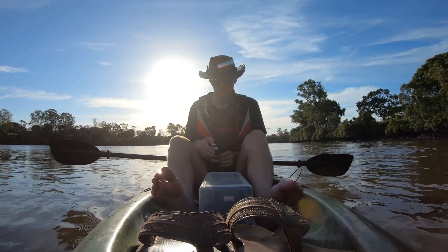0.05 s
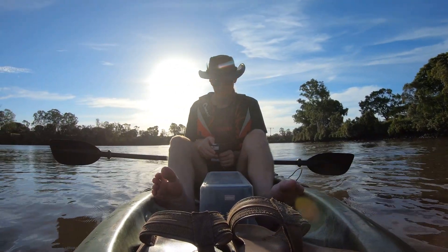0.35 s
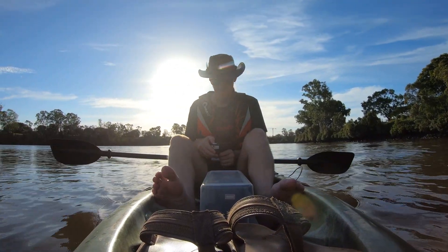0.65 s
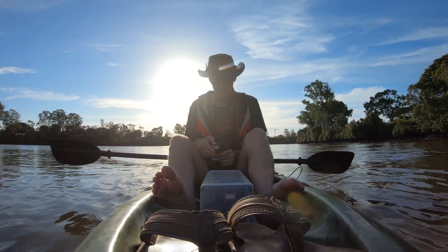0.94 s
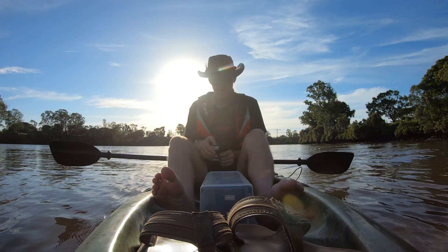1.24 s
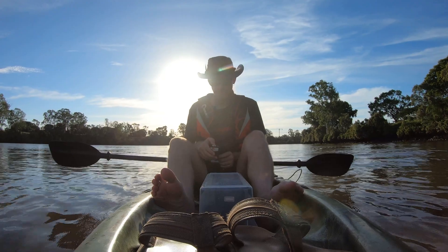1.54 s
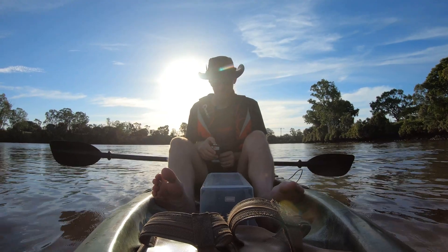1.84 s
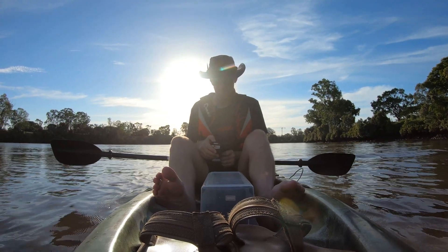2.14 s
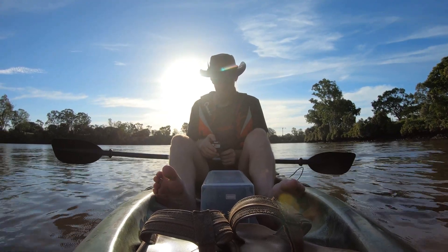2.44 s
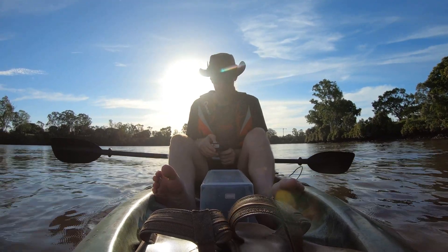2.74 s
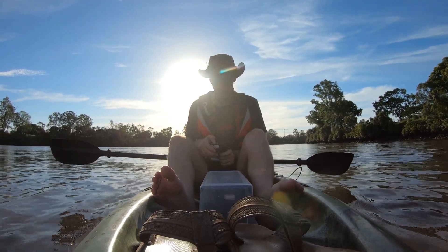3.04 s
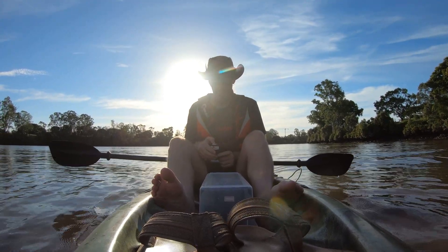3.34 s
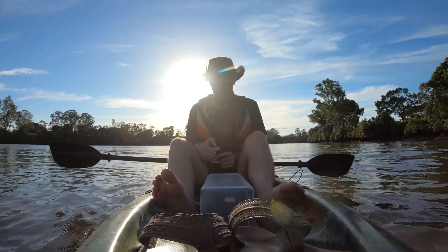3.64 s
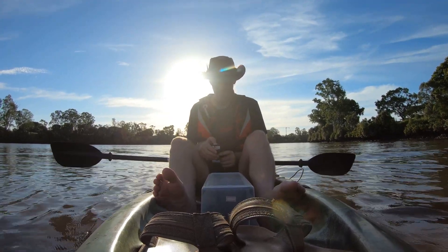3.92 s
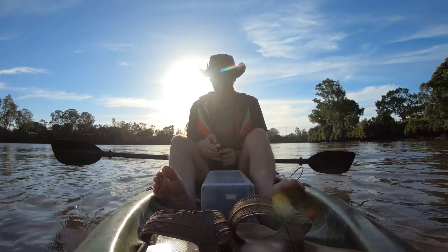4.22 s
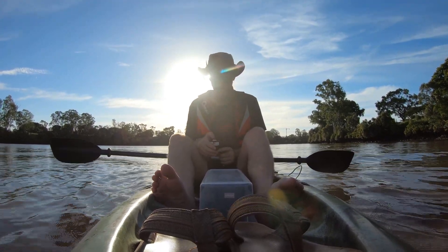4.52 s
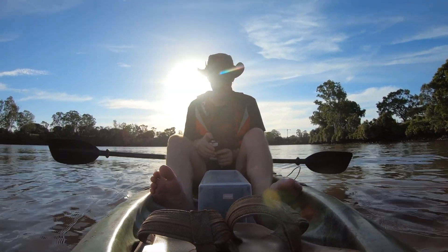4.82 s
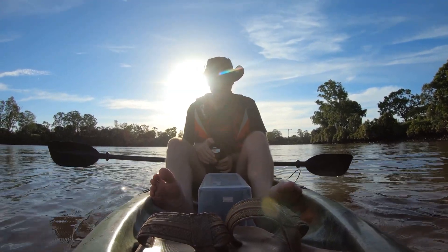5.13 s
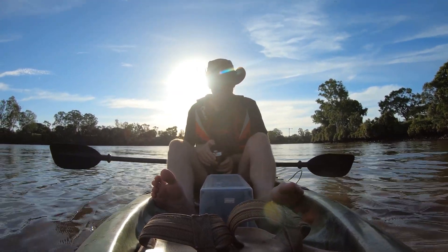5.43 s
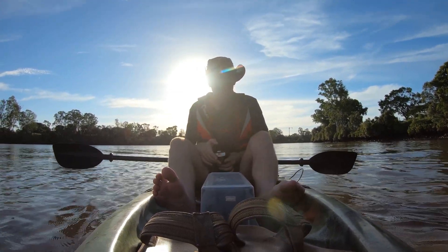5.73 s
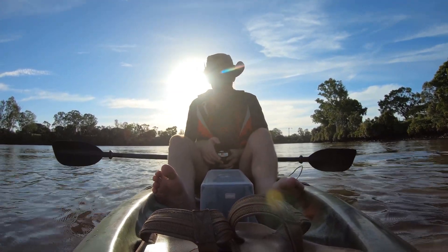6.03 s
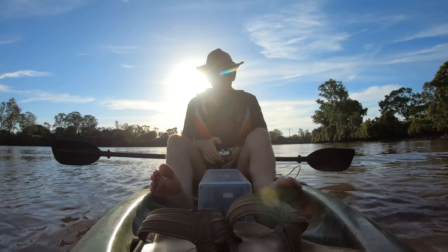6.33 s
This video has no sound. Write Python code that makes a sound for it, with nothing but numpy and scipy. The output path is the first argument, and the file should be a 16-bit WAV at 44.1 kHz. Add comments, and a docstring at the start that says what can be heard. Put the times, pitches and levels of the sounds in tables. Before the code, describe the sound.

Wavelets rush against a droning kayak hull, dying down to separate splashes and gurgles over a soft breeze and distant birds.

```python
"""Wavelets lap and churn under the hollow plastic hull of a kayak and make it drone, heard from the bow.
The boat crosses a rippled river; then the rush dies down and single wavelets slap and glug.
The water's voice is trapped air ringing as bubbles, with bursts of noise for the spray.
Behind it lie a soft hiss of breeze, a pulsing insect and thin, far bird whistles."""
import sys
import numpy as np
from scipy import signal
from scipy.fft import rfft, irfft, next_fast_len
from scipy.io import wavfile
from scipy.ndimage import uniform_filter1d

SR = 44100
rng = np.random.default_rng(int(sys.argv[2]) if len(sys.argv) > 2 else 0)


def bounce(signal):
    """Save signal as a 16-bit WAV file at the path given by the first command-line argument."""
    frames = np.transpose(np.atleast_2d(signal))
    limited = np.clip(frames, -1, 1)
    pcm = np.round(limited * 32767).astype(np.int16)
    wavfile.write(sys.argv[1], SR, pcm)


N = 280917
TIME = np.arange(N) / SR
FFT_SIZE = 2 * next_fast_len(N // 2 + 8192)
FREQ = np.maximum(np.arange(FFT_SIZE // 2 + 1) * SR / FFT_SIZE, 1)
FULL_FLOW_DB = -28

# Steady run of water under the bow. Each row: time in seconds, flow in dB, heave of the hull in dB.
FLOW = [(0, -39.5, -37), (.3, -32, -38.5), (.45, -29.5, -38.5), (.57, -30, -30.5), (1.3, -31.5, -29.5),
        (2, -31.5, -35.5), (2.2, -29.5, -25), (2.6, -31, -28), (2.95, -30, -30), (3.2, -30.5, -45),
        (3.46, -39.5, -29.5), (3.66, -52.5, -39.5), (3.9, -42.5, -44.5), (4.55, -42, -37),
        (5.1, -48.5, -38), (5.8, -42.5, -46), (6.37, -44.5, -43)]
# Wavelets slapping the bow. Each row: start in seconds, splash in dB, splash pitch in Hz,
# air pocket in dB, pocket pitch in Hz, spray in dB.
SLAPS = [(0.4855, -25, 1230, -23, 1116, -36.5), (0.5473, -35, 1330, -32, 585, -40),
         (0.57, -50, 1290, -32, 640, -49), (0.8046, -35, 2330, -29, 570, -33.5),
         (1.0011, -21.5, 1580, -26.5, 784, -37.5), (1.132, -37, 1940, -43, 950, -41.5),
         (1.249, -31, 1760, -31, 624, -46), (1.281, -12.5, 1430, -25, 633, -28),
         (1.485, -54, 1380, -40, 593, -40.5), (1.567, -44, 1110, -28, 612, -40.5),
         (1.691, -44, 2850, -25.5, 635, -37), (1.815, -37, 1530, -29, 895, -37),
         (1.892, -29, 1930, -47, 595, -73), (1.918, -24.5, 1630, -22, 678, -46),
         (2.0998, -21, 1270, -22, 774, -36), (2.375, -56, 2560, -47, 970, -38.5),
         (2.707, -46, 3140, -27.5, 580, -34.5), (2.9903, -18, 1356, -19.5, 576, -32.5),
         (3.2706, -27, 1550, -22.5, 600, -32.5), (3.3837, -33, 2790, -36, 925, -42.5),
         (3.4657, -24.5, 1890, -19, 582, -37.5), (3.766, -31, 3040, -39.5, 850, -39.5),
         (3.8624, -47, 3150, -47, 570, -39.5), (3.88, -48, 1950, -35, 815, -37.5),
         (3.959, -37, 2900, -35.5, 860, -39), (4.0622, -31, 1910, -51, 610, -35),
         (4.2086, -32, 1750, -18, 552, -32), (4.2235, -31, 1900, -27.5, 537, -43),
         (4.3229, -26.5, 3170, -53, 1150, -50), (4.3296, -30, 1540, -40, 920, -36),
         (4.3436, -30, 1440, -16.5, 858, -31.5), (4.398, -25.5, 3150, -45, 830, -40),
         (4.4621, -19.5, 2130, -26, 1090, -28.5), (4.4795, -13, 2220, -13.5, 523, -38),
         (4.4955, -31, 2170, -21.5, 570, -30.5), (4.629, -18.5, 2230, -27.5, 587, -35.5),
         (4.6396, -12.5, 2540, -19, 572, -37.5), (4.796, -44, 2050, -60, 670, -43),
         (4.8438, -20.5, 1970, -19.5, 1057, -29), (4.8925, -32, 1850, -26.5, 520, -61),
         (4.969, -25.5, 1900, -56, 580, -61), (5.2413, -20.5, 1500, -29, 900, -36.5),
         (5.262, -34, 1930, -21.5, 605, -44), (5.5295, -13.5, 1485, -15.5, 810, -27.5),
         (5.5377, -19, 2040, -20, 678, -50), (5.551, -47, 1600, -22, 890, -45),
         (5.569, -31, 1670, -33, 650, -41), (5.858, -30, 1080, -24.5, 935, -68),
         (5.9552, -31, 1435, -31.5, 516, -45), (6.0078, -26.5, 2200, -37, 680, -39.5),
         (6.111, -16.5, 1450, -13.5, 1010, -38), (6.304, -24, 3270, -54, 945, -54),
         (6.3546, -24.5, 1700, -32, 530, -40)]
# Tone curves of the spray and of the open air. Each row: frequency in Hz, gain in dB.
SPRAY_EQ = [(700, 7), (1500, 0), (2500, -0.5), (3800, 0.5), (5000, -7), (6300, -17.5), (8000, -17),
            (10000, -35.5), (13000, -45.5)]
AIR_EQ = [(100, 2.5), (300, 12), (520, 6.5), (720, 1), (1000, -1), (1800, -2), (3000, -1), (4000, -5),
          (5000, -9), (6200, -23), (7000, -22), (7900, -13.5), (8800, -29.5), (10000, -31), (11500, -52)]


def rush(hull, froth_db=-42.5, froth_growth=1.1):
    """Eddies and bubbles drum on the hull: deep heave, hollow churn and froth swell with each lap."""
    flow_db, heave_db = curves(FLOW)
    lap_churn, lap_froth = laps()
    flutter = undb(0.5 * walk(45))
    bubbling = bubbles(86.3, 1597, cycles=22.3, spread_db=2, count=2100)
    eddies = undb(-7.5) * unit(band(noise(), 13, 1800))
    body = colour(bubbling + eddies, hull)
    churn_gain = np.hypot(undb(flow_db + 2), undb(-0.5) * lap_churn)
    steady_froth = undb(froth_db + froth_growth * (flow_db - FULL_FLOW_DB))
    froth_gain = np.hypot(steady_froth, undb(1.24) * lap_froth)
    lift = uniform_filter1d(churn_gain / undb(flow_db), size=SR // 25) ** 0.99
    heave = even(band(colour(noise(), hull), 28.3, 86.4), span_s=0.2) * undb(heave_db - 2) * lift
    churn = even(band(body, 112.3, 365)) * churn_gain
    froth = even(band(body, 418, 1700)) * froth_gain
    return heave + flutter * (churn + froth)


def laps(attack_s=0.007, release_s=0.024):
    """Envelopes of churn and froth: each wavelet strikes quickly, runs along the hull and lets go."""
    # Wavelets under the hull. Each row: start in seconds, length in seconds, churn in dB, froth in dB.
    wavelets = [(0.356, 0.11, -24.5, -37.5), (0.516, 0.093, -23.5, -33.5), (0.642, 0.015, -33, -32),
                (0.717, 0.031, -27, -37), (0.762, 0.097, -19, -32.5), (0.88, 0.026, -25, -34.5),
                (0.981, 0.09, -19.5, -32), (1.113, 0.037, -24, -41), (1.194, 0.037, -35, -35),
                (1.23, 0.075, -20.5, -35.5), (1.307, .02, -37, -35.5), (1.466, 0.067, -19.5, -35),
                (1.56, 0.081, -26, -37), (1.667, 0.087, -22, -36.5), (1.803, 0.051, -25, -37),
                (1.924, 0.053, -25.5, -35), (2.056, 0.072, -30.5, -33.5), (2.171, 0.042, -22.5, -31),
                (2.262, 0.043, -23, -30.5), (2.339, 0.017, -29, -32), (2.392, 0.055, -22, -27),
                (2.49, 0.083, -28.5, -43), (2.696, 0.043, -22.5, -31), (2.778, 0.045, -29, -42),
                (2.862, 0.088, -22, -35.5), (2.983, 0.032, -23, -35), (3.032, 0.03, -22.5, -35),
                (3.09, 0.05, -26, -40), (3.179, 0.016, -22, -37.5), (3.24, 0.048, -24, -42)]
    churn_power, froth_power = np.zeros(N), np.zeros(N)
    t = TIME[:SR // 3]
    for start, length, churn_db, froth_db in wavelets:
        envelope = (1 - np.exp(-(t / attack_s) ** 2)) * np.exp(-np.maximum(t - length, 0) / release_s)
        add(churn_power, start, (undb(churn_db) * envelope) ** 2)
        add(froth_power, start, (undb(froth_db) * envelope) ** 2)
    return np.sqrt(churn_power), np.sqrt(froth_power)


def hull_response():
    """The hollow hull resonates, mostly in the bass: its gain at each of FREQ."""
    # Hull resonances. Each row: frequency in Hz, width in Hz, level in dB.
    modes = [(33, 25, -5), (59.8, 9.2, 0), (99.7, 49, -6.5), (131.1, 31, -0.5), (175, 32, 1),
             (218.4, 33, 1.5), (262.6, 82, 0.5), (493, 172, -16.5), (844, 240, -24.5), (1530, 280, -55.5)]
    power = sum(undb(db) ** 2 / (1 + ((FREQ - hz ** 2 / FREQ) / width) ** 2) ** 2
                for hz, width, db in modes)
    return np.sqrt(power)


def slaps(lead_s=0.04, rise_s=0.0051, fall_s=0.0027):
    """A wavelet hisses up the bow and closes on it: spray cracks, trapped air rings, bubbles scatter."""
    rings, cracks, fizz = np.zeros(N), np.zeros(N), np.zeros(N)
    t = TIME[:int(0.2 * SR)] - lead_s
    crack = spike(t - 0.001, rise_s=0.0004, fall_s=0.0014)
    foam = undb(-6) * (t > 0) * np.exp(-np.abs(t) / 0.0089)
    flow_db, _ = curves(FLOW)
    for start, splash_db, splash_hz, pocket_db, pocket_hz, spray_db in SLAPS:
        # Strong flow draws the wetting out and softens the crack.
        stretch = 1 + 2.2 * undb(np.interp(start, TIME, flow_db) - FULL_FLOW_DB) ** 2
        wetting = foam * np.sqrt(stretch) + spike(t, rise_s * stretch, fall_s * stretch)
        add(cracks, start - lead_s, undb(spray_db + 17) / np.sqrt(stretch) * crack * noise(len(t)))
        add(fizz, start - lead_s, undb(spray_db + 2) * wetting * noise(len(t)))
        ping = bubble(splash_hz, cycles=46, glide=0.07, swell=2.4)
        small = cluster(0.762 * splash_hz, 1.614 * splash_hz, 0.0071 * stretch, cycles=23.6, count=6)
        pocket = bubble(pocket_hz, cycles=30, glide=0.039, swell=0.52)
        large = cluster(565, 1248, scatter_s=0.012, cycles=46, count=3)
        add(rings, start, undb(splash_db - 6) * ping)
        add(rings, start, undb(splash_db - 14.5) * small)
        add(rings, start + 0.001075, undb(pocket_db - 1.25) * pocket)
        add(rings, start, undb(pocket_db - 14.5) * large)
    spatter = band(fizz, 410, 6700) * undb(4.8 * walk(500))  # the hiss is made of uneven droplets
    return bow_panel(rings + colour(cracks + spatter, contour(SPRAY_EQ)))


def bow_panel(strike):
    """The thin plastic wall of the bow rings briefly along with whatever strikes it."""
    # Modes of the wall. Each row: frequency in Hz, width in Hz, level in dB.
    modes = [(1410, 120, -8.5), (2096, 130, -6.5)]
    return strike + sum(undb(db) * signal.lfilter(*signal.iirpeak(hz, hz / width, fs=SR), strike)
                        for hz, width, db in modes)


def gurgle(rise_s=0.0064, fade_s=0.018):
    """The air folded in by a slap breaks up into a short-lived swarm of bubbles, large and small."""
    large_power, small_power = np.zeros(N), np.zeros(N)
    t = TIME[:SR // 4]
    swarm = (1 - np.exp(-(t / rise_s) ** 2)) * np.exp(-t / fade_s)
    for start, splash_db, _, pocket_db, _, _ in SLAPS:
        add(large_power, start, (undb(pocket_db - 14) * swarm) ** 2)
        add(small_power, start, (undb(splash_db - 19) * swarm) ** 2)
    large = even(bubbles(560, 1100, cycles=28, spread_db=-5.5, count=1100))
    small = even(bubbles(1300, 2600, cycles=45, spread_db=4.5, count=2200))
    return np.sqrt(large_power) * large + np.sqrt(small_power) * small


def glugs(hull, swell_s=0.0075, rise_per_s=1.2, boom_hz=330, large_db=-13.5):
    """Air pockets swell, ring and shed smaller plops; the hull booms on after the large, low ones."""
    # Air pockets under the hull. Each row: start in seconds, level in dB, pitch in Hz.
    pockets = [(0.026, -24, 230), (0.19, -16.5, 187), (.566, -20.5, 561), (.588, -22.5, 570),
               (0.365, -19, 230), (0.533, -22, 496), (.658, -16.5, 209), (.731, -27, 550),
               (1.376, -19, 238), (1.443, -16.5, 250), (1.756, -16.5, 264), (2.096, -12.5, 270),
               (2.195, -15.5, 220), (2.267, -19, 280), (2.349, -22.5, 497), (2.412, -20.5, 475),
               (2.825, -16.5, 250), (2.895, -16.5, 270), (3.044, -15.5, 236), (3.12, -15, 129),
               (3.22, -21, 137), (3.269, -25.5, 404), (3.466, -28, 315), (3.408, -20, 291),
               (3.519, -20.5, 250), (4.0635, -8.5, 238), (4.065, -13.5, 379), (4.084, -14, 204),
               (4.175, -19, 89), (4.239, -15.5, 280), (4.346, -19, 551), (4.347, -14, 254),
               (4.484, -14, 174), (4.487, -22.5, 410), (4.497, -12.5, 133), (4.641, -13.5, 224),
               (4.703, -20, 98), (4.842, -28.5, 284), (4.854, -22.5, 123), (5.039, -19, 106),
               (5.105, -27, 167), (5.248, -17, 159), (5.353, -22, 107), (5.468, -27, 253),
               (5.542, -19, 154), (5.571, -21, 201), (5.717, -20, 329), (5.732, -19, 205),
               (5.967, -21, 216), (6.078, -16.5, 166), (6.116, -14.5, 145), (6.182, -25, 171),
               (6.354, -15, 264)]
    rings, wash = np.zeros(N), np.zeros(N)
    t = TIME[:int(0.2 * SR)]
    envelope = (t / swell_s * np.exp(1 - t / swell_s)) ** 2
    for start, db, hz in pockets:
        tone = np.sin(2 * np.pi * hz * t * (1 + rise_per_s * t / 2))
        add(rings, start, undb(db - 1) * envelope * tone)
        plop_hz = np.clip(2.4 * hz, 350, 560)
        plop_db = -27.5 + 4.2 * min(db - large_db, 0)  # small glugs barely plop
        add(rings, start, undb(plop_db) * bubble(plop_hz, cycles=24, glide=0.33, swell=1.6))
        add(rings, start, undb(plop_db + 2.5) * cluster(324, 640, scatter_s=0.0125, cycles=11, count=3))
        boom_gain = undb(db + 7.5) * min(boom_hz / hz, 1) ** 2
        add(wash, start, boom_gain * np.exp(-t / 0.037) * noise(len(t)))
    return rings + band(colour(wash, hull), 91, 970)


def drops(splash_s=0.008):
    """A drop strikes with a tiny splash and leaves a bubble that rings and rises in pitch."""
    # Drops falling beside the bow. Each row: start in seconds, bubble pitch in Hz, level in dB.
    falls = [(1.249, 5370, -36), (1.271, 4900, -38), (1.486, 3540, -29), (1.671, 3350, -34),
             (1.746, 2120, -34.5), (1.8, 1600, -46), (1.919, 3750, -38), (1.95, 2300, -36),
             (2.076, 3180, -32.5), (2.26, 4270, -35.5), (3.238, 2460, -31), (3.899, 4000, -35),
             (3.918, 3580, -34), (4.079, 3230, -32), (4.225, 1626, -25.5), (4.626, 4800, -42),
             (4.64, 4600, -35), (4.721, 4800, -38.5), (4.785, 4700, -34.5), (4.796, 4900, -31),
             (5.955, 5650, -30), (6.02, 3030, -29.5), (6.324, 2100, -30.5)]
    out = np.zeros(N)
    t = TIME[:SR // 20]
    for start, hz, db in falls:
        splash = unit(band(noise(len(t)), 0.39 * hz, 1.17 * hz)) * np.exp(-t / splash_s)
        add(out, start, undb(db - 7) * splash)
        add(out, start, undb(db - 4) * bubble(hz, cycles=50, glide=0.076, swell=5.6))
    return out


def ripples():
    """Each slap throws droplets that patter back; fine bubbles burst along the waterline with each lap."""
    patter = np.zeros(N)
    for start, *_, spray_db in SLAPS:
        for lag, pitch, size in rng.random((8, 3)):
            droplet = bubble(1100 * 4.5 ** pitch, cycles=16, glide=0.087, swell=1.2)
            gain = undb(spray_db - 17.5 - 10 * size - 6.8 * lag)
            add(patter, start + 0.013 + 0.06 * lag ** 2, gain * droplet)
    flow_db, _ = curves(FLOW)
    _, lap_froth = laps()
    wetness = np.hypot(undb(-57 + 0.64 * (flow_db - FULL_FLOW_DB)), undb(-21) * lap_froth)
    trickle = wetness * bubbles(1100, 6500, cycles=35, spread_db=3.5, count=1100)
    return colour(patter + trickle, contour(SPRAY_EQ))


def crackle():
    """Fine droplets tick on the bow, more loudly while the water runs fast."""
    flow_db, _ = curves(FLOW)
    ticks = colour(bubbles(2000, 9000, cycles=4.5, spread_db=3, count=130), np.sqrt(contour(SPRAY_EQ)))
    return unit(ticks) * undb(-63 + 0.25 * (flow_db - FULL_FLOW_DB))


def sizzle(fade_s=0.13):
    """The foam left by heavy spray sizzles on as its tiny bubbles burst."""
    foam = np.zeros(N)
    for start, *_, spray_db in SLAPS:
        add(foam, start, undb(spray_db) ** 4 * np.exp(-TIME[:SR] / fade_s))
    foam_eq = np.sqrt(contour(SPRAY_EQ) * contour(AIR_EQ))
    bursts = unit(band(colour(noise(), foam_eq), 3800, 10500))
    return undb(-58) * np.sqrt(foam / foam.max()) * bursts * undb(2.5 * walk(600))


def air():
    """Soft hiss of open water and breeze."""
    # Fader ride of the hiss. Each row: time in seconds, level in dB between 2 and 5 kHz.
    ride = [(0, -55), (2.5, -54.5), (4.2, -53), (4.7, -58.5), (5.4, -52.5), (6.37, -52)]
    hiss = colour(noise(), contour(AIR_EQ))
    hiss_db, = curves(ride)
    return hiss / np.std(band(hiss, 2000, 5000)) * undb(hiss_db + 0.5 * walk(9))


def insect(hz=4420, width_hz=380, pulse_hz=28):
    """A faint, pulsing trill from the bank that sinks away and comes back."""
    pulses = 0.5 + 0.5 * sine(pulse_hz * (1 + 0.025 * walk(2.6)))
    trill = unit(pulses * band(noise(), hz - width_hz / 2, hz + width_hz / 2))
    return trill * undb(-62 + np.interp(TIME, [0.9, 1.6, 3.1, 3.8], [-2.5, -14.5, -3.5, -6.5]))


def birds(echo_s=0.031):
    """Thin, wavering whistles, blurred by their way over the water."""
    # Far calls. Each row: start in seconds, length in seconds, first and last pitch in Hz, level in dB.
    whistles = [(0.12, 0.11, 2640, 2450, -50), (1.02, 0.04, 4340, 5270, -44),
                (2.421, 0.11, 3060, 3270, -47), (2.664, 0.18, 3320, 2950, -53),
                (3.088, 0.055, 2190, 2310, -50), (3.133, 0.15, 2650, 3130, -51),
                (1.222, 0.22, 5450, 5200, -59), (4.358, 0.049, 4600, 4680, -49),
                (3.32, .035, 2220, 2200, -41), (3.343, .045, 2430, 2800, -48),
                (3.405, 0.064, 2330, 2680, -47), (3.449, 0.093, 2830, 3023, -40.5),
                (3.542, .16, 3030, 2960, -47), (3.567, 0.04, 2680, 2310, -43),
                (3.897, 0.135, 2220, 2430, -46), (4.093, 0.073, 4500, 4540, -47),
                (5.048, 0.03, 2360, 3090, -39), (5.043, .04, 4700, 5700, -52),
                (5.394, .04, 4700, 4900, -46), (5.491, 0.04, 2680, 2870, -44),
                (5.503, 0.2, 7250, 7300, -62)]
    calls = np.zeros(N)
    waver = 1 + 0.011 * walk(250)
    for start, length, first_hz, last_hz, db in whistles + chorus():
        progress = np.linspace(0, 1, int(length * SR))
        glide_hz = first_hz + (last_hz - first_hz) * np.sin(np.pi / 2 * progress)
        tone = sine(glide_hz * waver[int(start * SR):][:len(progress)])
        envelope = np.sqrt(np.abs(np.sin(np.pi * progress)))
        add(calls, start, undb(db) * envelope * tone)
    calls *= undb(2.5 * walk(110) - 2)  # the level flickers
    t = TIME[:SR // 2]
    tail = noise(len(t)) * np.exp(-t / echo_s)
    echo = signal.fftconvolve(calls, tail / np.linalg.norm(tail))[:N]
    return undb(-6) * (calls + echo)


def chorus(lo_hz=2200, hi_hz=4300, db=-57, count=22):
    """Whistle rows for the fainter birds along the banks, each at a random moment and pitch."""
    rows = []
    for when, length, pitch, bend in rng.random((count, 4)):
        hz = lo_hz * (hi_hz / lo_hz) ** pitch
        rows.append((when * (N / SR - 0.3), 0.06 + 0.14 * length, hz, hz * (0.88 + 0.24 * bend), db))
    return rows


def bubble(hz, cycles, glide, swell):
    """Trapped air rings and glides up: it builds over `swell` periods and dies over about `cycles`."""
    t60 = np.clip(cycles / hz, 0.003, 0.15)
    t = TIME[:int(t60 * SR * 1.2)]
    envelope = (1 - np.exp(-(t * hz / swell) ** 2)) * np.exp(-np.log(1000) * t / t60)
    return envelope / envelope.max() * np.sin(2 * np.pi * hz * t * (1 + glide * t / t60 / 2))


def bubbles(lo_hz, hi_hz, cycles, spread_db, count):
    """A stream of bubbles of random moment, pitch and size."""
    out = np.zeros(N)
    for when, pitch, size, sign in rng.random((count, 4)):
        hz = lo_hz * (hi_hz / lo_hz) ** pitch
        gain = undb(spread_db * min(-np.log(1 - size), 4)) * np.sign(sign - 0.5)
        add(out, when * N / SR, gain * bubble(hz, cycles, glide=0.16, swell=0.37))
    return unit(out)


def cluster(lo_hz, hi_hz, scatter_s, cycles, count):
    """A handful of bubbles born close together, one per size class, with the energy of 10 ms at rms 1."""
    out = np.zeros(N)
    for k, (lag, pitch, sign) in enumerate(rng.random((count, 3))):
        hz = lo_hz * (hi_hz / lo_hz) ** ((k + pitch) / count)
        gain = np.sign(sign - 0.5) * undb(-7 * lag)
        add(out, scatter_s * lag ** 2, gain * bubble(hz, cycles, glide=0.081, swell=0.93))
    out = out[:SR // 8]
    return out / np.sqrt(np.sum(out ** 2) / (SR // 100))


def undb(db):
    return 10 ** (np.asarray(db) / 20)


def unit(x):
    return x / np.sqrt(np.mean(x ** 2) + 1e-18)


def noise(samples=N):
    return rng.standard_normal(samples)


def sine(hz):
    return np.sin(2 * np.pi * np.cumsum(hz) / SR)


def spike(t, rise_s, fall_s):
    """Envelope that grows and decays exponentially around t = 0."""
    return 1 / (np.exp(-t / rise_s) + np.exp(t / fall_s))


def curves(rows):
    """Each column after a table's time column, as a value per sample."""
    times, *columns = np.transpose(rows)
    return [np.interp(TIME, times, column) for column in columns]


def add(out, start_s, x):
    i = int(np.clip(start_s * SR, 0, N - 1))
    out[i:i + len(x)] += x[:N - i]


def band(x, lo_hz, hi_hz):
    return signal.sosfilt(signal.butter(4, [lo_hz, hi_hz], "band", fs=SR, output="sos"), x)


def colour(x, gain):
    """Minimum-phase filter with the given gain at each of FREQ."""
    cepstrum = irfft(np.log(gain + 1e-7))
    cepstrum[1:FFT_SIZE // 2] *= 2
    cepstrum[FFT_SIZE // 2 + 1:] = 0
    return irfft(rfft(x, FFT_SIZE) * np.exp(rfft(cepstrum)))[:N]


def contour(points):
    """Gain at each of FREQ from (Hz, dB) points."""
    hz, db = np.transpose(points)
    return undb(np.interp(np.log(FREQ), np.log(hz), db))


def walk(rate_hz):
    """Smooth random drift at rms 1."""
    hold = int(SR / rate_hz)
    steps = np.repeat(noise(N // hold + 1), hold)
    return unit(uniform_filter1d(uniform_filter1d(steps, hold), hold)[:N])


def even(x, span_s=0.042):
    """Unit level with the slow swells ironed out; the fast flutter stays."""
    power = uniform_filter1d(unit(x) ** 2, int(span_s * SR))
    return unit(unit(x) / np.sqrt(power + 0.054))


def scene():
    """Water on the hull up close, air and wildlife behind it, in mono."""
    hull = hull_response()
    water = rush(hull) + slaps() + gurgle() + glugs(hull) + drops() + ripples() + crackle() + sizzle()
    return (water + air() + insect() + birds())[None]


def record(dry, ceiling=0.66, top_hz=11500):
    """Soft saturation rounds the loudest peaks and a steep low-pass cuts the top."""
    lowpass = signal.ellip(8, 0.2, 70, top_hz, fs=SR, output="sos")
    return signal.sosfilt(lowpass, ceiling * np.tanh(dry / ceiling))


dry = scene()
out = record(dry)
bounce(out)
```